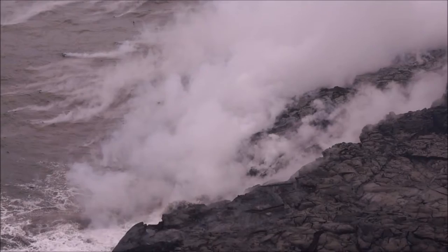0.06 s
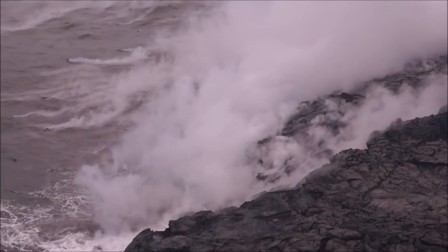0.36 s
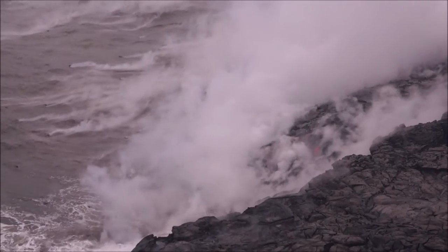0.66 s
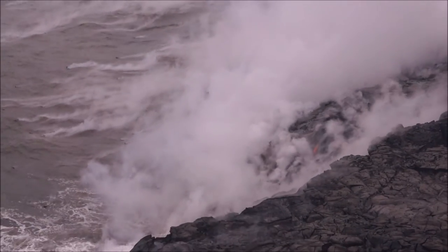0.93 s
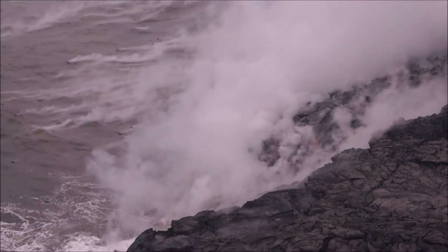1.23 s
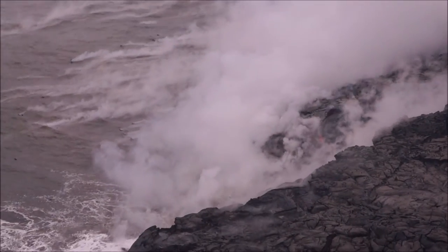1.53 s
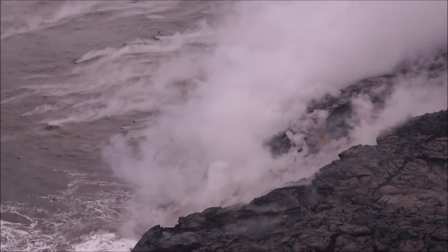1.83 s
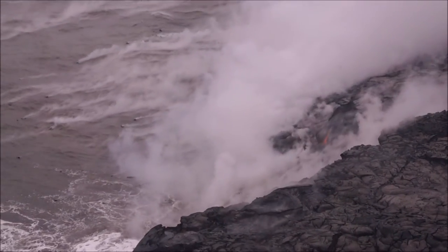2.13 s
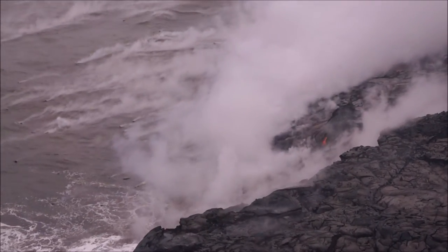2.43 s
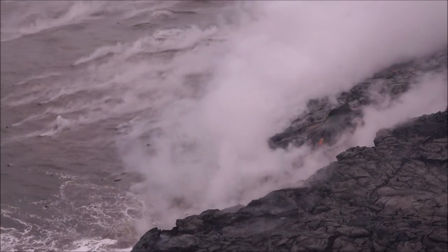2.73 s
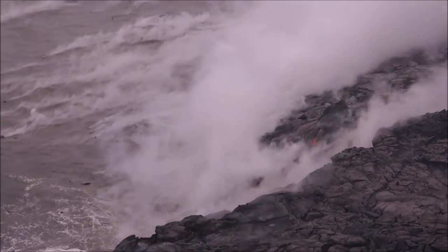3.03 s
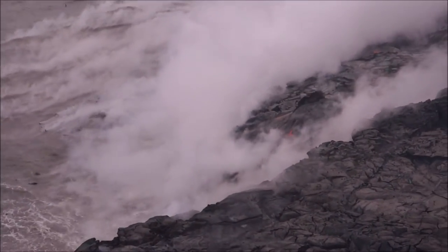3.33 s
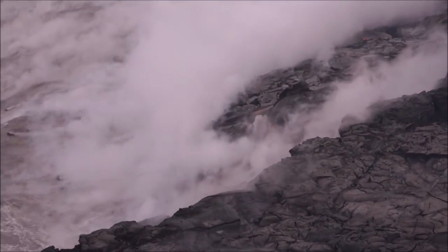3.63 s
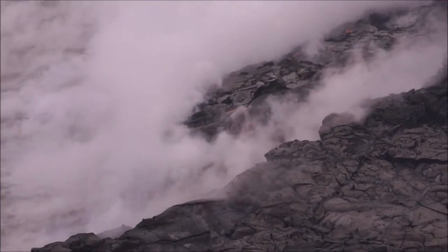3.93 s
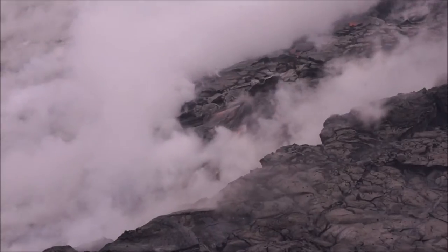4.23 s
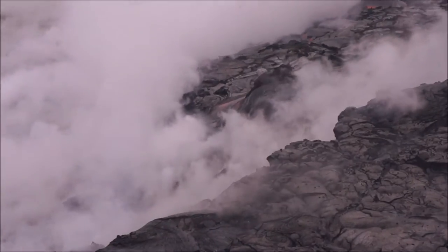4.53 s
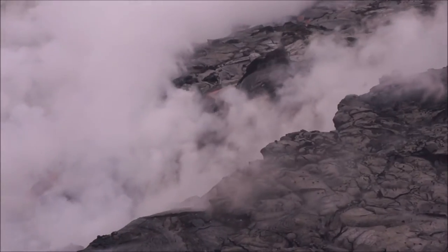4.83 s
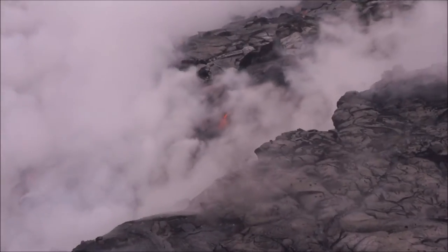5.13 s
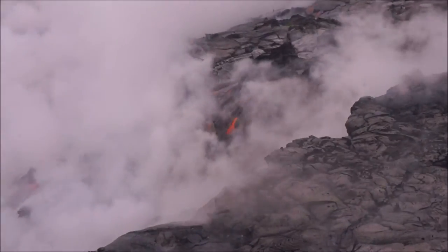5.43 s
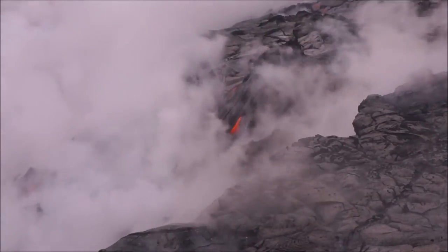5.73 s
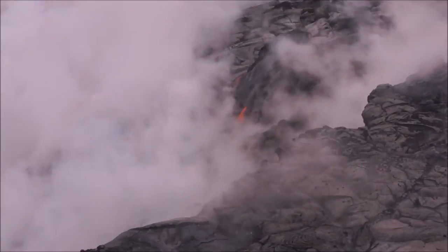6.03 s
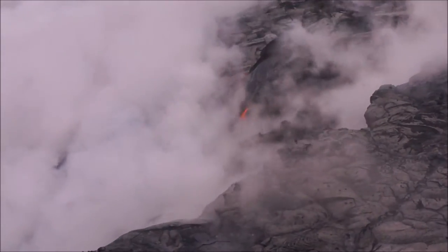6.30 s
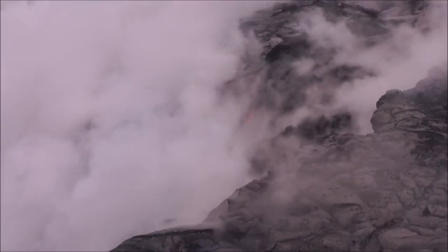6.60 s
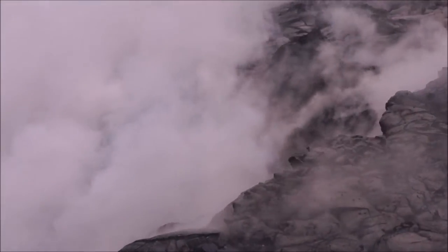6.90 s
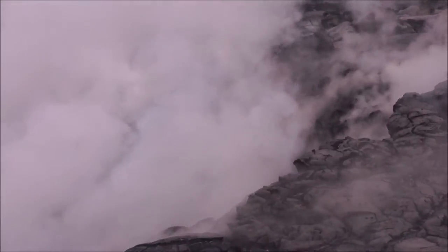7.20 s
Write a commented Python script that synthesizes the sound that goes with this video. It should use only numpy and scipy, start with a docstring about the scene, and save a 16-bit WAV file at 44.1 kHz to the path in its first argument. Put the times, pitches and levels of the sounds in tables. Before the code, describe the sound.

Surf roars continuously against a rocky shore while steam hisses and lightly crackles where lava meets the water. Early on, a wave swells and bubbles sputter, ending in a sharp pop that briefly lowers the overall level. Wind buffets the microphone, then the hiss surges with another wave and a second loud pop follows. The sound dips again and builds gradually, with a few small ticks.

```python
"""Lava runs into the sea below a rocky shore. From the start, surf roars, steam hisses off the hot rock
and gusts buffet the microphone. Near 1 s a wave breaks, steam jets and sputters, and a bubble bursts
with a loud pop that ducks the recorder's gain, which creeps back up. From 3 s a second wave brings
more jets and another loud pop. The gain ducks and creeps up again, over a slight steady rise that runs
through the whole scene, while a close reflection combs the hiss at ever higher frequencies."""
import sys
import numpy as np
from scipy import signal
from scipy.fft import rfft, irfft, next_fast_len
from scipy.io import wavfile

SR = 44100
rng = np.random.default_rng(int(sys.argv[2]) if len(sys.argv) > 2 else 0)


def to_wav(s):
    """Save 16-bit WAV."""
    ch = np.atleast_2d(s).T  # columns
    pcm = np.round(np.clip(ch, -1, 1) * 32767)  # PCM
    wavfile.write(sys.argv[1], SR, pcm.astype(np.int16))


N = 328986
TIME = np.arange(N) / SR
FRAME, HOP = 1024, 256
FRAME_S = np.arange(N // HOP + 5) * HOP / SR
BIN_HZ = np.fft.rfftfreq(FRAME, 1 / SR)
OPPOSED = np.array([[1], [-1]])  # left up, right down


def amp(db):
    """Amplitude ratio of a level in decibels."""
    return 10 ** (np.asarray(db) / 20)


def unit(x):
    """Normalisation to an rms of one."""
    return x / np.sqrt(np.mean(x ** 2) + 1e-20)


def over_hz(points, hz=BIN_HZ):
    """Interpolation on a logarithmic frequency axis."""
    point_hz, value = np.transpose(points)
    return np.interp(np.log(hz + 1), np.log(point_hz + 1), value)


def over_time(rows, t, column=1):
    """Linear interpolation of one column at the times t."""
    rows = np.asarray(rows)
    return np.interp(t, rows[:, 0], rows[:, column])


def swells(rows, t):
    """Gaussian envelopes, summed as a lift in dB."""
    return sum(lift_db * np.exp(-((t - s) / half_s) ** 2) for s, half_s, lift_db in rows)


def eddies(span_s, span_hz):
    """A correlated random field: noise smoothed into patches over time and frequency."""
    field = rng.standard_normal((len(FRAME_S), len(BIN_HZ)))
    along = np.fft.fftfreq(len(FRAME_S), HOP / SR)[:, None] * span_s
    across = np.fft.rfftfreq(len(BIN_HZ), SR / FRAME) * span_hz
    smoothing = np.exp(-2 * (along ** 2 + across ** 2))
    return unit(np.fft.irfft2(np.fft.rfft2(field) * smoothing, field.shape))


# Likeness of the two channels. Each row: frequency in Hz, coherence from 0 to 1.
COHERENCE = [(200, .99), (600, .975), (1100, .96), (1700, .82), (2300, .91), (3700, .84), (4500, .92),
             (7200, .92), (8200, .988), (10300, .994), (12000, .998)]
# Phase between the channels. Each row: frequency in Hz, lead of the left in radians.
PHASE_LEAD = [(300, 0.047), (1900, -0.083), (3450, 0.17), (4200, -0.043), (6900, -0.4), (8300, 0)]
def turbulence(colour_db, unrest_db):
    """Turbulent flow radiates random noise: partly coherent stereo, modulated band by band."""
    a, b, c, d = rng.standard_normal((4, len(FRAME_S), len(BIN_HZ)))
    left, independent = a + 1j * b, c + 1j * d
    coherence = over_hz(COHERENCE)
    right = coherence * left + np.sqrt(1 - coherence ** 2) * independent
    right *= np.exp(-1j * over_hz(PHASE_LEAD))
    colour = amp(colour_db)
    shape = colour / np.linalg.norm(colour, axis=-1, keepdims=True) * amp(unrest_db)
    spectra = np.array([(left * shape).T, (right * shape).T])
    return unit(signal.istft(spectra, nperseg=FRAME, noverlap=FRAME - HOP)[1][:, :N])


def burst(hz, half_s, sag):
    """A Gaussian wave packet whose pitch sags, as a bubble's resonance does when it swells."""
    u = np.arange(-4 * half_s, 4 * half_s, 1 / SR) / half_s
    turns = np.cumsum(hz * np.exp(-sag * np.tanh(u))) / SR
    return np.exp(-u ** 2) * np.sin(2 * np.pi * (turns + rng.random()))


def scattered_bursts(rows, sag, scatter_db, scatter_s, delay_s=0.0017):
    """Diffuse reflection: rough rocks return a decaying tail just after each direct burst."""
    direct = np.zeros(N)
    for s, db, hz, half_s in rows:
        packet = amp(db) * burst(hz, half_s, sag)
        start = round(s * SR) - len(packet) // 2
        direct[start:start + len(packet)] += packet
    t = TIME[:SR // 8]
    rocks = rng.standard_normal((2, len(t))) * np.exp(-t / scatter_s) * (t > delay_s)
    rocks /= np.linalg.norm(rocks, axis=1, keepdims=True)
    return direct + amp(scatter_db) * signal.oaconvolve(direct[None], rocks, axes=1)[:, :N]


def grains(per_s, low_hz, high_hz, cycles, spread_db, pitches=24):
    """Shot noise: small bursts of random size arrive independently, each pitch from its own place."""
    swarm = np.zeros((2, N))
    for hz in np.geomspace(low_hz, high_hz, pitches):
        sizes = amp(spread_db * np.minimum(rng.exponential(1, N), 4))
        arrivals = rng.random(N) < per_s / pitches / SR
        pan = amp(OPPOSED * rng.normal(0, 1))
        swarm += pan * signal.oaconvolve(sizes * arrivals, burst(hz, cycles / hz, sag=0.25))[:N]
    return unit(swarm)


# Spectrum of the wind. Each row: frequency in Hz, relative level in dB.
WIND_SPECTRUM = [(20, -32), (40, -31), (70, -11.5), (120, -4), (220, 0.5), (350, -6), (550, -8),
                 (1000, -30), (2500, -90)]
# Gusts. Each row: peak time in seconds, level in dB, time constant of rise and fall in seconds.
GUSTS = [(0.695, -14, .022), (0.84, -17, 0.032), (0.99, -14.5, 0.06), (1.3, -27, 0.18), (2.41, -11.5, .045),
         (2.56, -15, 0.016), (2.8, -30, 0.076), (3.45, -23, 0.015), (4.15, -22, 0.018), (4.23, -20, 0.02),
         (4.71, -31, 0.028), (5.16, -29, .03), (5.43, -23, 0.048), (6.12, -27, .04), (6.76, -22, 0.027),
         (7.33, -32, 0.03)]
# Single eddies. Each row: time in seconds, level in dB, pitch in Hz, half length in seconds.
BUFFETS = [(0.7, -5, 240, .003), (0.834, -2.5, 322, .0023), (0.992, -0.5, 293, .0033),
           (2.385, -4.5, 290, .0023), (2.406, 7.5, 363, .0023), (2.418, -1, 269, .0023),
           (2.439, -1, 242, 0.00296), (2.475, -6, 239, .0037), (2.562, -2, 233, .003),
           (3.45, -2.5, 310, .002)]
def wind(breeze_db=-36.5, crossing_s=0.00059):
    """Convected pressure fluctuations reach the microphone's right port first, then the left."""
    colour = amp(over_hz(WIND_SPECTRUM, np.fft.rfftfreq(N, 1 / SR)))
    shared, apart = irfft(rfft(rng.standard_normal((2, N))) * colour, N)
    level = amp(breeze_db) + sum(amp(db) * np.exp(-abs(TIME - s) / tau_s) for s, db, tau_s in GUSTS)
    buffets = scattered_bursts(BUFFETS, sag=0.3, scatter_db=-17, scatter_s=0.0091)
    left, right = level * unit(shared) + buffets
    ports = np.array([np.interp(TIME - crossing_s, TIME, left), right])
    return ports + amp(-16) * level * OPPOSED * unit(apart)


# Two spectra of the surf. Each row: frequency in Hz, relative level in dB.
SURF_EARLY = [(24, -58), (40, -41), (81, -21), (188, -12.5), (215, -8.5), (357, -3), (416, -5.5),
              (456, -2.5), (815, -3.5), (867, -1.5), (950, -1), (1090, 2), (1460, -10), (1550, -10),
              (2020, -34), (3410, -120)]
SURF_LATE = [(35, -51), (60, -20), (118, -15.5), (176, -9.5), (329, -2), (366, 2.5), (426, 0.5),
             (606, -0.5), (649, -0.5), (863, 0), (1110, 0.5), (1300, -2), (1550, -8), (2020, -41),
             (3410, -120)]
# Their blend. Each row: time in seconds, share of the late spectrum from 0 to 1.
SURF_BLEND = [(0.3, 0.2), (1.3, 0.4), (2.0, 0.4), (3.3, .02), (3.8, 0.3), (4.4, 0.44), (6.2, 0.75),
              (7.4, 0.94)]
# Breaking waves and troughs. Each row: centre in seconds, half length in seconds, lift in dB.
WAVES = [(0.52, .12, 0.5), (0.93, 0.24, 2.5), (3.09, 0.3, 3), (3.87, 0.36, -1.4), (5.62, .22, 0.7),
         (6.45, 0.34, 0.8), (6.87, 0.074, -2.5), (7.34, 0.16, 2.5)]
def surf(wash_db=-15, boil_db=-27):
    """Turbulent water roars and boiling bubbles resonate in it; both swell with the waves."""
    late = over_time(SURF_BLEND, FRAME_S)[:, None]
    colour_db = (1 - late) * over_hz(SURF_EARLY) + late * over_hz(SURF_LATE)
    wash = turbulence(colour_db, 0.9 * eddies(0.07, 170) + 0.48 * eddies(0.026, 3700))
    boil = grains(per_s=400, low_hz=400.7, high_hz=1403, cycles=1.396, spread_db=3)
    return amp(swells(WAVES, TIME)) * (amp(wash_db) * wash + amp(boil_db) * boil)


# A close reflection. Each row: time in seconds, second null in Hz, relative strength from 0 to 1.
REFLECTION = [(0.3, 7300, 0.3), (1.3, 7440, 0.2), (2, 7230, 0.3), (3.1, 7300, 0.42), (3.6, 7650, 0.27),
              (4.3, 8350, .15), (5.3, 8500, 0.22), (6, 8860, 0.2), (7.4, 10500, 0.3)]
def reflection():
    """Interference combs the treble, in dB; the nulls climb as the reflection's extra path shortens."""
    phase_lag = 3 * np.pi * BIN_HZ / over_time(REFLECTION, FRAME_S)[:, None]
    treble = np.interp(BIN_HZ, (3620, 6740, 10000, 14000), (0, 1, 0.81, 0.3))
    strength = over_time(REFLECTION, FRAME_S, column=2)[:, None] * treble
    return 20 * np.log10(abs(1 + strength * np.exp(1j * phase_lag)))


# Steam jets. Each row: centre in seconds, half length in seconds, lift in dB, pitch in Hz,
# half width in octaves.
JETS = [(0.51, 0.18, 4, 9800, 1.2), (0.9, 0.08, 3, 1900, .3), (1.33, 0.2, 3.5, 7400, 1.7),
        (2.776, 0.27, 3, 2900, 1.3), (3.076, 0.25, 6, 6000, 1.74), (3.21, 0.11, 4.5, 3120, 0.44),
        (3.25, 0.071, 6, 10900, .76), (3.682, 0.22, 5, 7800, 1.8), (4.37, 0.42, 1.5, 7070, 1),
        (4.73, 0.15, 3, 1970, .42), (4.913, 0.065, 3.2, 5560, .98), (6.39, 0.16, 1.1, 5000, 1.0),
        (7.148, 0.25, 4, 9300, 1.13), (7.32, 0.31, 2, 2700, .8)]
def jets():
    """Jet noise has a broad spectral peak: each jet lifts a band around its pitch, in dB."""
    lift_db = 0
    for s, half_s, peak_db, hz, octaves in JETS:
        band = np.exp(-(np.log2((BIN_HZ + 1) / hz) / octaves) ** 2)
        lift_db += swells([(s, half_s, peak_db)], FRAME_S[:, None]) * band
    return lift_db


# Spectrum of the spray. Each row: frequency in Hz, relative level in dB.
SPRAY_SPECTRUM = [(2000, -68.0), (5500, -24), (7000, -8), (8000, 1), (9200, -1), (10500, -3.0),
                  (12500, -8.0), (14200, -12.5), (15600, -15.5)]
def spray(sizzle_db=-25.5, droplets_db=-46):
    """Small sources radiate high frequencies: fine droplets tick, and their sizzle follows the jets."""
    colour_db = over_hz(SPRAY_SPECTRUM) + reflection()
    sizzle = turbulence(colour_db, jets() + 1.3 * eddies(0.05, 450) + 0.42 * eddies(0.015, 8000))
    droplets = grains(per_s=120, low_hz=7000, high_hz=12000, cycles=1.2, spread_db=-1, pitches=8)
    return amp(sizzle_db) * sizzle + amp(droplets_db) * droplets.mean(0)


# Bright spits. Each row: time in seconds, level in dB, pitch in Hz, half length in seconds.
SPITS = [(2.370, -14, 13000, .0003), (5.570, -3, 9300, .0002), (6.080, -5, 7900, .0002),
         (6.502, 2, 3800, .00025)]
def spits():
    """A short pulse has a wide spectrum, so each spit is heard as a tick."""
    return scattered_bursts(SPITS, sag=0.18, scatter_db=-4, scatter_s=0.003).mean(0)


# Spectrum of the steam. Each row: frequency in Hz, relative level in dB.
STEAM_SPECTRUM = [(300, -65), (900, -9.5), (1400, -3.5), (1700, -1.4), (2050, -0.3), (2400, 0),
                  (3050, -1.5), (3750, -5.5), (4400, -4.5), (5600, -7), (7000, -8), (8000, -16),
                  (9500, -24.5), (14000, -75)]
# Water sputtering on hot rock. Each row: centre in seconds, half length in seconds, lift in dB.
SPUTTERS = [(0.47, 0.11, 7), (0.87, 0.098, 12), (1.8, 0.87, 4.5), (3.49, .1, 6), (6.0, 0.37, 5.5)]
def steam(hiss_db=-14, crackle_db=-27.5):
    """Turbulent steam hisses and swells with each jet; boiling on the hot rock makes bubbles crackle."""
    colour_db = over_hz(STEAM_SPECTRUM) + reflection()
    hiss = turbulence(colour_db, jets() + eddies(0.054, 340) + 0.5 * eddies(0.015, 8000))
    crackle = grains(per_s=380, low_hz=890, high_hz=3440, cycles=1, spread_db=2)
    return amp(hiss_db) * hiss + amp(crackle_db + swells(SPUTTERS, TIME)) * crackle


# Bursting steam bubbles. Each row: time in seconds, level in dB, pitch in Hz, half length in seconds.
POPS = [(0.84, -3, 1410, .0014), (0.865, -0.3, 1616, 0.0024), (0.885, -2.5, 1600, .0005),
        (0.894, -1, 1310, .0007), (0.9, -6, 1500, .0011), (0.942, 10.5, 1400, .0012),
        (1.133, 2, 1240, .0016), (1.314, -2, 1490, .001), (1.584, 2.5, 1750, .0005),
        (1.715, -2, 1526, 0.0021), (2.149, -2, 1490, .001), (2.946, 1, 1380, .0007),
        (2.953, -2, 1410, 0.0028), (3.4523, -0.5, 2300, .0007), (3.49, -6, 1610, .001),
        (3.496, 0.3, 1330, 0.0012), (3.544, 9.5, 1950, .00065), (3.912, 2, 1500, .001),
        (4.976, -5, 1670, 0.0012), (6.275, -10, 1100, 0.0017)]
def bubble_pops(snap_db=-10.5, snap_hz=3600, snap_half_s=0.00025):
    """Sudden pressure release: a steam bubble rings briefly, and its tearing skin adds a snap."""
    rings = scattered_bursts(POPS, sag=0.24, scatter_db=-8, scatter_s=0.0067)
    snaps = [(s, db + snap_db, snap_hz, snap_half_s) for s, db, _, _ in POPS]
    return rings + scattered_bursts(snaps, sag=0.194, scatter_db=-8, scatter_s=0.004)


# Sideways drift of surf, steam and pops. Each row: time in seconds, left minus right level in dB.
BALANCE = [(0.3, 0.5), (0.5, 0.5), (1.01, -1.0), (1.23, 0.0), (3.54, -1.0), (3.96, 0.5), (5.86, 0.5),
           (7.4, 1.5)]
def scene(rise_db_per_s=0.8):
    """Superposition: the sources add, and the sum rises slightly and steadily from start to end."""
    pops, ticks = bubble_pops(), spits()
    sides = amp(OPPOSED / 2 * over_time(BALANCE, TIME))
    shore = (surf() + steam() + pops) * sides
    rise = amp(rise_db_per_s * (TIME - TIME[-1]))
    return rise * (shore + spray() + ticks + wind())


def gain_control(x, threshold_db=2, depth_db=9.3, initial_db=3, recover_db_per_s=2.5, ahead_s=0.016):
    """Automatic gain control: the gain steps down just ahead of a loud midrange peak, then creeps up."""
    midrange = signal.sosfilt(signal.butter(2, (1100, 2700), "bandpass", fs=SR, output="sos"), x.mean(0))
    envelope = abs(signal.hilbert(midrange, next_fast_len(N))[:N])
    too_loud = envelope > amp(threshold_db)
    recovered_db = recover_db_per_s * TIME
    held_db = np.maximum.accumulate(np.maximum(depth_db * too_loud + recovered_db, initial_db))
    duck_db = held_db - recovered_db
    return x * amp(-np.interp(TIME + ahead_s, TIME, duck_db))


def record(dry, fade_in_s=(0.162, 0.28), cutoff_hz=15750):
    """Gain control and a fade-in, then soft saturation of the peaks and a low-pass band limit."""
    faded = gain_control(dry) * np.interp(TIME, fade_in_s, (0, 1))
    rounded = faded / (1 + faded ** 8) ** (1 / 8)
    low_pass = signal.firwin(511, cutoff_hz, window=("kaiser", 9), fs=SR)
    return signal.oaconvolve(rounded, low_pass[None], "same")


dry = scene()
out = record(dry)
to_wav(out)
```